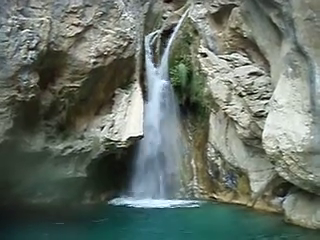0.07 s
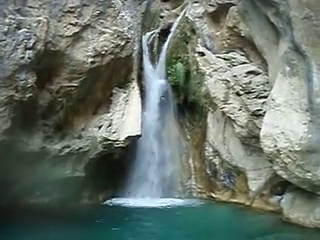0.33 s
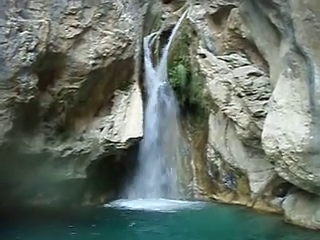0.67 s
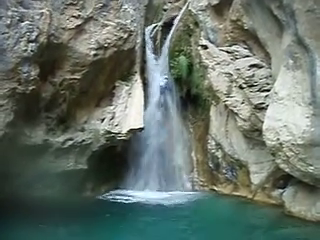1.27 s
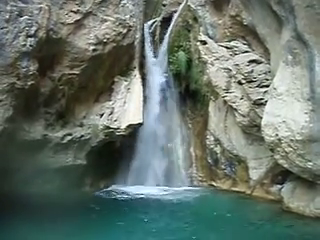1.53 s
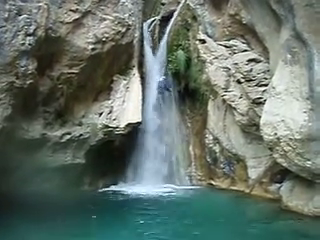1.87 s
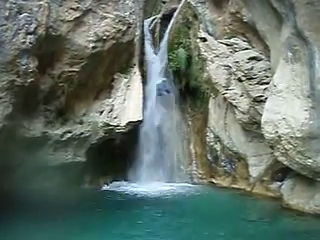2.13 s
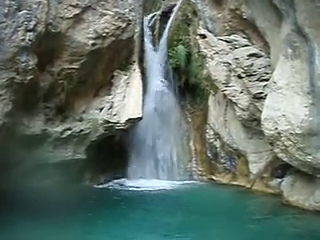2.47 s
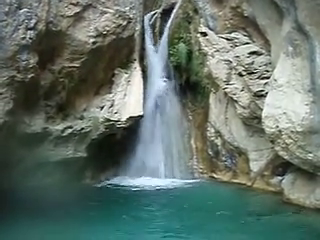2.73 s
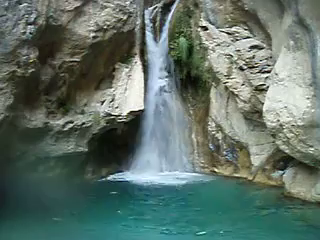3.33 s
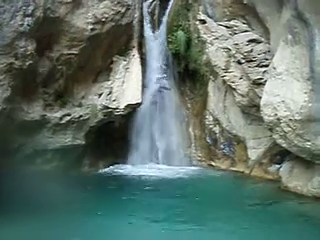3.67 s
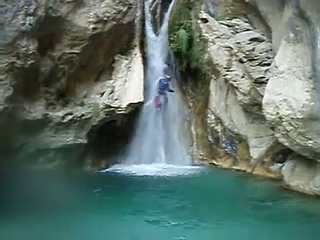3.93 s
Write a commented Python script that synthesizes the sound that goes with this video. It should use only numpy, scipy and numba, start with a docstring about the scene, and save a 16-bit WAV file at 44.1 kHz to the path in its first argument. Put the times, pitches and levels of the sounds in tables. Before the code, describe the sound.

A waterfall roars without a break as it drops between rock walls into an outdoor pool. Hissing spray and fine bubbling blend above churning water, picked up by one microphone with little treble and occasional faint crackles.

```python
"""A narrow waterfall pours steadily down a rock recess into a pool, heard on one microphone.
Countless drops and small bubbles merge into a roar; underneath, the plunging jet churns the water
and stirs hollow resonances in the recess. The recorder rings sharply near 3 kHz, passes little
above it, and crackles where the highest crests overload."""
import sys
import numpy as np
from scipy import signal
from scipy.fft import rfft, irfft
from scipy.io import wavfile
from numba import njit

SR = 44100
rng = np.random.default_rng(int(sys.argv[2]) if len(sys.argv) > 2 else 0)


def wav_record(signal):
    """Record a signal, one row per channel, as 16-bit PCM in the file named by sys.argv[1]."""
    frames = np.transpose(np.atleast_2d(signal))
    bounded = np.clip(frames, -1, 1)
    # unit amplitude maps onto the largest positive 16-bit level
    quanta = np.round(bounded * 32767).astype(np.int16)
    wavfile.write(sys.argv[1], SR, quanta)


N = 176400
t = np.arange(N) / SR
FREQS = np.maximum(np.fft.rfftfreq(N, 1 / SR), 1)
SPRAY_DB, BUBBLE_DB, CHURN_DB = -25.5, -33, -42.5  # balance of the sources ahead of the recorder


def undb(db):
    """Decibels to gain."""
    return 10 ** (np.asarray(db) / 20)


def level(x, db):
    """Set the rms level."""
    return x * undb(db) / np.sqrt(np.mean(x ** 2))


def noise(response):
    """White noise shaped by a gain at each frequency."""
    return irfft(rfft(rng.standard_normal(N)) * response, N)


def spectrum(points):
    """Gain at each frequency, drawn through (Hz, dB) points."""
    hz, db = np.array(points, float).T
    return undb(np.interp(np.log(FREQS), np.log(hz), db))


def resonance(hz, width_hz):
    """Response of a damped oscillator: flat below its peak, falling above."""
    return 1 / (1 - (FREQS / hz) ** 2 + 1j * FREQS * width_hz / hz ** 2)


def wander(rate_hz):
    """Smooth random wander about zero with spread 1."""
    slow = np.exp(-(FREQS / rate_hz) ** 2)
    slow[0] = 0
    return level(noise(slow), 0)


def bump(at_s, half_s):
    """A smooth bump in time, 1 at its top."""
    return np.exp(-np.minimum(((t - at_s) / half_s) ** 2, 50))


def spray(flow_db):
    """Countless drops hit the pool: a hiss that flickers, follows the flow and swells briefly."""
    # The hiss of the drops. Each row: frequency in Hz, relative level in dB.
    hiss_tone = [(20, -47.5), (100, -22), (200, -7.5), (400, -3.5), (800, -3.5), (1050, -0.5), (1500, -3),
                 (2200, -1.5), (2800, -1), (3500, -2.39), (3750, -6), (4050, -16.5), (4400, -19.5)]
    # Brief swells of the hiss that push the limiter into crackles.
    # Each row: time of the peak in seconds, lift in dB.
    crest_lifts = [(0.117, 3.1), (0.161, 1.8), (0.313, 1.4), (0.386, 1.7), (0.451, 2.4), (0.513, 4.3),
                   (0.745, 3.3), (1.076, 2.8), (1.178, 2.0), (1.209, 3.1), (1.267, 3.1), (1.429, 1.8),
                   (1.458, 1.3), (1.629, 2.2), (1.693, 2.5), (1.887, 3.4), (1.946, 2.1), (2.041, 2.1),
                   (2.262, 3.7), (2.299, 2.9), (2.331, 3.6), (2.46, 2.4), (2.558, 1.9), (2.712, 1.2),
                   (2.923, 2.4), (2.957, 2.2), (2.983, 2.0), (3.007, 2.8), (3.106, 1.4), (3.169, 0.8),
                   (3.36, 2.1), (3.464, 2.2), (3.521, 2.3), (3.893, 3.4)]
    flow_share, flicker_db = .12, -0.27
    lift_db = sum(db * bump(at_s, half_s=0.008) for at_s, db in crest_lifts)
    sway_db = flow_share * flow_db + flicker_db * wander(rate_hz=25)
    return level(noise(spectrum(hiss_tone)) * undb(sway_db + lift_db), SPRAY_DB)


def plunge(flow_db):
    """The jet churns the pool and stirs hollow resonances in the recess, surging with the flow."""
    # The churn under the jet. Each row: frequency in Hz, relative level in dB.
    churn_tone = [(20, -31.5), (35, -26.5), (50, -13.5), (67, -6), (90, -6), (155, -0.5), (220, -3),
                  (400, -11.5), (900, -18.5), (2000, -47.5)]
    # Resonances of the recess. Each row: frequency in Hz, width in Hz, level in dB at average flow.
    hollows = [(216, 28, -46.5), (266, 40, -41.5), (323, 47, -44), (521, 47, -40), (645, 170, -35)]
    water = level(noise(spectrum(churn_tone)), CHURN_DB)
    for hz, width_hz, db in hollows:
        band = FREQS * resonance(hz, width_hz)  # falls away on both sides of the peak
        water += level(noise(band), db)
    return water * undb(flow_db)


def bubbles():
    """Air trapped in the foam rings briefly, each bubble rising in pitch as it dies away."""
    per_s, low_hz, high_hz, scatter_db = 2500, 444.4, 3823, 3.5
    cycles, rise = 7, .06  # cycles to fall to 1/e; fractional pitch rise in that time
    max_samples = 2048
    foam = np.zeros(N + max_samples)
    for when, pitch, strength in rng.random((int(per_s * N / SR), 3)):
        hz = low_hz * (high_hz / low_hz) ** np.sqrt(pitch)  # favours the upper octaves
        length = min(max_samples, int(5 * cycles / hz * SR))
        age = t[:length] * hz / cycles  # in decay times
        ring = np.exp(-age) * np.cos(2 * np.pi * cycles * age * (1 + rise * age / 2))
        start = int(when * N)
        foam[start:start + length] += ring * np.sqrt(hz) * undb(scatter_db * (2 * strength - 1))
    return level(foam[:N], BUBBLE_DB)


@njit
def follow_peaks(x, decay):
    """The limiter's envelope: it jumps to each crest and falls back exponentially."""
    envelope, held = np.empty(len(x)), 0.
    for i in range(len(x)):
        held = max(abs(x[i]), held * decay)
        envelope[i] = held
    return envelope


def scene():
    """At the pool, one slowly changing flow drives spray and plunge while bubbles seethe throughout."""
    # The strength of the plunge. Each row: time in seconds, level in dB about its mean.
    flow = [(0.0, 1.5), (0.25, 1.5), (0.5, 0.7), (0.75, -0.3), (1.0, 1.8), (1.25, 1.2), (1.5, -0.9),
            (1.75, 1), (2.0, -0.5), (2.25, 2.6), (2.5, -2), (2.75, 0.2), (3.0, -0.7), (3.25, -0.3),
            (3.5, -1), (3.75, -1.7), (4.0, -0.5)]
    flow_db = np.interp(t, *np.array(flow).T)
    waterfall = spray(flow_db) + plunge(flow_db) + bubbles()
    dip_db = -6.5 * bump(at_s=1.897, half_s=0.0063)  # the level dips briefly once
    return (waterfall * undb(dip_db))[None]


def record(dry):
    """The mono recorder rings and cuts the treble; its instant limiter ticks on each crest it catches."""
    pass_hz, top_hz = 4430, 15900
    limit_db, release_s, knee = -3, .0015, 35  # a higher knee bends more abruptly
    roll_off = 1 / np.sqrt(1 + (FREQS / pass_hz) ** 90)
    coloured = irfft(rfft(dry[0]) * resonance(hz=3124, width_hz=227) * roll_off, N)
    crests = follow_peaks(coloured, np.exp(-1 / (release_s * SR)))
    limited = coloured / (1 + (crests / undb(limit_db)) ** knee) ** (1 / knee)
    top_cut = signal.firwin(511, top_hz, fs=SR)  # trims the very top of the ticks
    return signal.fftconvolve(limited, top_cut, "same")[None]


dry = scene()
out = record(dry)
wav_record(out)
```